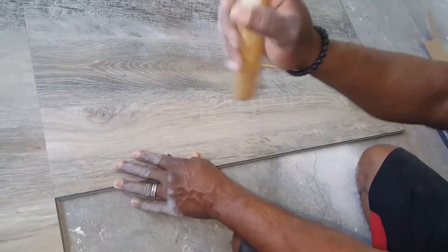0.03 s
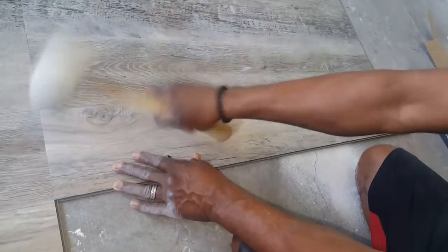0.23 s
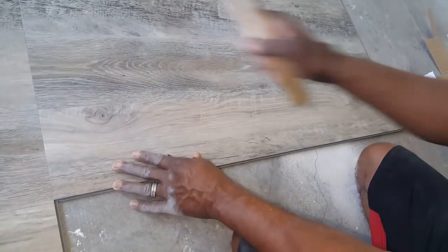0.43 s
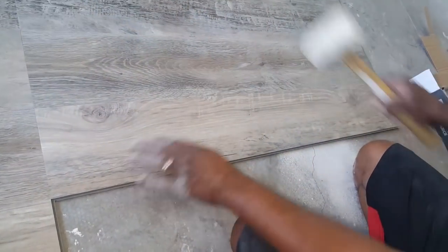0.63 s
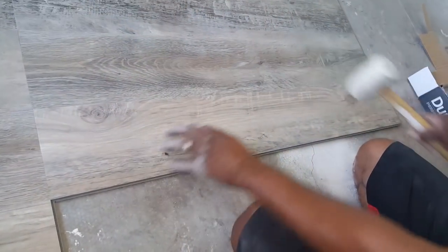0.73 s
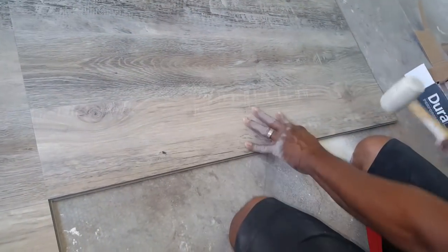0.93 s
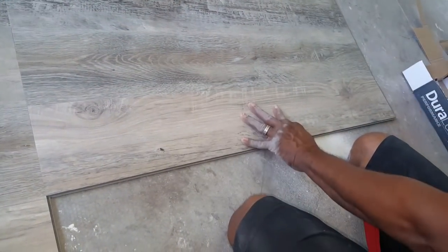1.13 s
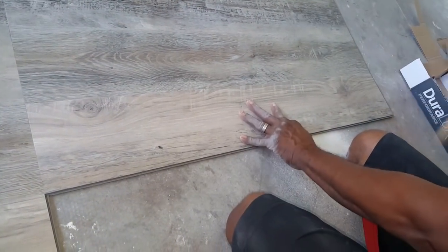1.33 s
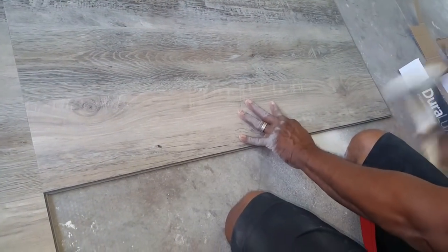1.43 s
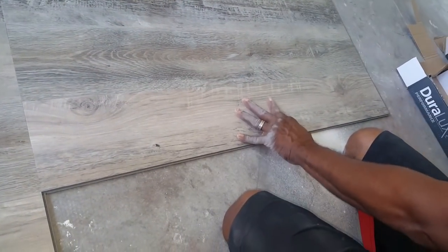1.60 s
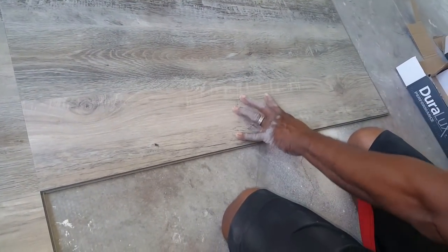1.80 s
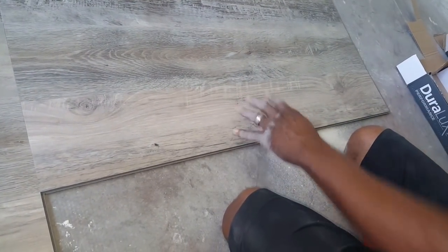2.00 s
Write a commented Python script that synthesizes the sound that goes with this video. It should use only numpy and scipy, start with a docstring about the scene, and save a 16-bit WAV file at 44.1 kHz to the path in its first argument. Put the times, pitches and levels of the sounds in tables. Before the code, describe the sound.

Rubber mallet knocks a floor plank into place, two hard echoing blows in a bare room

```python
"""A rubber mallet knocks a vinyl plank home on a concrete floor in a bare, echoing room.
The take opens in the echo of a blow just before the start; knocks follow near 0.5 and 1.7 s, each a
coloured pulse in a noise-built room plus ringing plank modes. After each, a sliding low cut thins the left.
An open left microphone overloads and a muffled right one rumbles; room tone, hum, brief noise bands and
hiss, made of shaped noise and a sine, lie beneath."""
import sys
import numpy as np
from scipy import signal
from scipy.fft import rfft, irfft
from scipy.io import wavfile

SR = 44100
rng = np.random.default_rng(int(sys.argv[2]) if len(sys.argv) > 2 else 0)


def unload_wav(signal):
    """Save mono or channel-first audio to the path in sys.argv[1] as 16-bit WAV at rate SR, clipped to [-1, 1]."""
    wavfile.write(
        sys.argv[1],
        SR,
        np.round(np.clip(np.atleast_2d(signal).T, -1, 1) * 32767).astype(np.int16),
    )


N = 90713  # samples in the take

# edge of the sliding low cut on the left: [t/s, f/Hz, depth 0-1, lift just above the edge/dB]
EDGE = [(0, 3470, 0.59, -4), (.15, 1950, 0.34, -17), (.19, 1740, 0.29, 16), (.3, 1890, 0.28, 18),
        (.38, 1650, 0.78, 10), (.39, 1650, 0.03, 28), (.555, 890, 0, 28), (.568, 2260, 0.58, 7),
        (.59, 4800, 0.55, 12.5), (.635, 6750, 0.85, 1), (.67, 6500, 0.81, 1), (.695, 5940, 0.68, -17),
        (.715, 3330, 0.78, -11), (.8, 2500, 0.79, -1), (.88, 1700, 0.69, 10), (1.015, 1570, 0.85, 12),
        (1.03, 1500, 0.19, 2.3), (1.785, 710, 0, 4.5), (1.8, 2040, 0.8, 13.5), (1.82, 4020, 0.69, 17),
        (1.855, 5830, 0.75, 7), (1.865, 2850, 0.81, -7), (1.95, 2560, 0.82, 2.5), (2.06, 1570, 0.86, 6)]


def amp(db):
    """Amplitude factor of a level in dB."""
    return 10 ** (np.asarray(db) / 20)


def evened(x):
    """Scales x to an rms of 1."""
    return x / np.sqrt(np.mean(x ** 2) + 1e-20)


def read(points, hz):
    """Reads a two-column curve, interpolated over log frequency."""
    f, value = np.transpose(points)
    return np.interp(np.log(hz + 1), np.log(f + 1), value)


def over_time(points, t, column=1):
    """Reads one column of a table whose first column is time."""
    rows = np.array(points)
    return np.interp(t, rows[:, 0], rows[:, column])


def shaped(x, gain):
    """Filters x by a function of Hz."""
    return irfft(rfft(x) * gain(np.fft.rfftfreq(len(x), 1 / SR)), len(x))


def noise(colour):
    """Steady noise with the given colour and an rms of 1."""
    return evened(shaped(rng.standard_normal(N), lambda hz: amp(read(colour, hz))))


def ring(modes, t):
    """Sum of resonances, each a sine that dies away exponentially."""
    return sum(amp(db - 60 * t / t60) * np.sin(2 * np.pi * hz * t) for hz, db, t60 in modes)


def blow(colour, s, force_db, thud_db, right_db, rise_s):
    """One knock: the pulse excites the room and the plank rings; heard at both microphones."""
    # ringing of the plank: [f/Hz, level/dB, t60/s]
    plank_modes = [(56, -21.5, 0.045), (92.6, -3.5, 0.14), (123, -2.5, 0.11), (165, 2, 0.087),
                   (292.5, -19, 0.015), (468, -28, 0.1), (867, 9, 0.019), (1600, -29, 0.12),
                   (1952, 1, 0.059)]
    # tone of the muffled right microphone: [f/Hz, level/dB]
    muffle = [(8, -38), (40, -10), (150, -10.5), (400, -9.5), (1000, -13), (2000, -17), (4500, -18),
              (8000, -44.5), (15000, -33)]
    # likeness of the room sound at the two microphones: [f/Hz, likeness 0-1]
    likeness = [(40, .6), (200, 0.81), (500, 0.67), (1000, 0.78), (2000, 0.17), (15000, .05)]
    blow_db, thud_right_db = 24.5, -2
    lead_rad = 1  # phase turn of the shared sound on the right

    thud = ring(plank_modes, np.arange(8000) / SR)
    thud = -amp(thud_db) * thud / np.linalg.norm(thud)
    pulse = click(colour)
    left_room = signal.fftconvolve(room(), pulse)
    other_room = signal.fftconvolve(room(), pulse)

    pad = 8192  # lead-in samples, for a blow before the start
    size, at = N + pad, pad + round(s * SR)
    near, other, body = np.zeros((3, size))
    for line, heard in ((near, left_room), (other, other_room), (body, thud)):
        rise = (1 - np.exp(-np.arange(len(heard)) / (rise_s * SR))) ** 2
        line[at:][:len(heard)] = (heard * rise)[:size - at]

    def shared_gain(hz):
        same = np.clip(read(likeness, hz), 0, 1)
        return same * amp(read(muffle, hz)) * np.exp(-1j * lead_rad)

    def separate_gain(hz):
        same = np.clip(read(likeness, hz), 0, 1)
        return np.sqrt(1 - same ** 2) * amp(read(muffle, hz))

    right = shaped(near + amp(thud_right_db) * body, shared_gain) + shaped(other, separate_gain)
    right[:at] = 0  # nothing ahead of the blow
    both = np.array([near + body, amp(right_db) * right])
    return amp(blow_db + force_db) * both[:, pad:]


def click(colour):
    """Causal minimum-phase pulse with the given colour and an energy of 1."""
    log_gain = np.log(amp(read(colour, abs(np.fft.fftfreq(4096, 1 / SR)))))
    pulse = np.fft.ifft(np.exp(np.conj(signal.hilbert(log_gain)))).real[:2048]
    return pulse / np.linalg.norm(pulse)


def room():
    """Response of the bare room: plank slap, near walls, standing waves and two overlapping tails."""
    # near walls: [delay t/s, level/dB]
    walls = [(.013, -10), (.021, -13), (.027, -12.5), (0.032, -8)]
    # two overlapping tails, each with its own decay by frequency: [f/Hz, t60/s]
    first_decay = [(40, .2), (150, 0.75), (500, 0.9), (1500, 1), (4000, 0.39), (9000, 0.55), (15000, 0.41)]
    second_decay = [(40, 0.1), (150, 1.07), (500, 1.025), (1500, 0.76), (4000, 1.256), (9000, 0.89),
                    (15000, 0.15)]
    # standing waves: [f/Hz, level/dB, t60/s]
    standing_waves = [(178.5, -8.5, 0.44), (240, -17, 1.345), (356.4, -10, 0.86), (427.6, -13, 0.92)]
    first_db, second_db, build_s = -1.5, -4.5, 0.006
    slap_delay_s, slap_decay_s, slap_db = 0.00086, 0.0028, 3

    t = np.arange(2 * SR) / SR
    build = 1 - np.exp(-t / build_s)
    hz, frames, z = signal.stft(rng.standard_normal(len(t)), SR, nperseg=256)
    tails = []
    for db, decay in ((first_db, first_decay), (second_db, second_decay)):
        t60 = read(decay, hz)[:, None]
        tails.append(amp(db - 60 * frames / t60) / np.sqrt(t60))
    diffuse = signal.istft(z * np.hypot(*tails), SR, nperseg=256)[1][:len(t)]
    out = diffuse * build * np.sqrt(14 / SR)

    # the plank's slap and each wall echo are short noise bursts
    for delay, db in [(slap_delay_s, slap_db)] + walls:
        burst = rng.standard_normal(1500) * np.exp(-t[:1500] / slap_decay_s)
        out[round(delay * SR):][:1500] += amp(db) * burst / np.linalg.norm(burst)
    return out + ring(standing_waves, t) * build / np.sqrt(SR)


def limited(x):
    """Gain control that falls at once and recovers steadily, then soft clipping."""
    limit_db, limit_share = -8, 0.23  # threshold; share of the excess that is taken off
    held_fall = 188  # dB/s, fall of the held level after a peak
    knee, ceiling = 14, 0.86  # sharpness of the clipping, full-scale share
    power_db = 10 * np.log10(abs(signal.lfilter([.01], [1, -.99], x ** 2)) + 1e-12)
    fall = np.arange(N) * held_fall / SR
    held_db = np.maximum.accumulate(power_db + fall) - fall
    over_db = np.maximum(held_db - limit_db, 0)
    x = x / amp(limit_share * over_db)
    return ceiling * x / (1 + abs(x) ** knee) ** (1 / knee)


def sliding_cut(x):
    """Filter that lowers all below a moving edge and lifts or dips a band just above it."""
    # gain below the edge at full depth: [f/Hz, level/dB]
    cut = [(40, -2.5), (150, -24), (600, -18.5), (1500, -20.5), (2800, -21), (3600, -14), (4500, -26),
           (7000, -15.5)]
    notch_db, notch_oct = -3, 0.15  # extra cut just under the edge
    peak_oct, steep_oct = 0.22, 0.11  # widths of the lift and of the edge itself
    hz, t, z = signal.stft(x, SR, nperseg=512, noverlap=448)
    depth = over_time(EDGE, t, column=2)
    lift_db = over_time(EDGE, t, column=3) * np.minimum(10 * depth, 1)  # fades at slight depth
    octaves = np.log2((hz[:, None] + 1) / over_time(EDGE, t))
    below = .5 - .5 * np.tanh(octaves / steep_oct)
    notch = notch_db * np.exp(-(octaves / notch_oct) ** 2)
    db = below * (read(cut, hz)[:, None] + notch) * depth
    db += (1 - below) * lift_db * np.exp(-(octaves / peak_oct) ** 2)
    return signal.istft(z * amp(db), SR, nperseg=512, noverlap=448)[1][:N]


def rumble(t):
    """Lumpy low noise, strong on the right and faint on the left, lowered as the cut deepens."""
    # swells of the rumble: [t/s, level/dB]
    swells = [(0, -51), (.39, -42.5), (.41, -42), (.43, -54), (.46, -34), (.495, -58), (.52, -45),
              (1.03, -50.5), (1.08, -55.5), (1.14, -56.5), (1.22, -58), (1.26, -57), (1.285, -37),
              (1.31, -56), (1.37, -42), (1.42, -53.5), (1.445, -52), (1.47, -49), (1.53, -47), (1.555, -48),
              (1.6, -48), (1.67, -49), (1.695, -50), (1.75, -47.5), (2.06, -50)]
    # tone of the rumble: [f/Hz, level/dB]
    rumble_colour = [(20, -9), (60, 12), (120, 10), (250, -9.5), (500, -39.5), (1000, -62), (15000, -92.5)]
    lump_db, left_db, cut_db = 2.5, -12.5, -25
    lumps = evened(shaped(rng.standard_normal(N), lambda hz: np.exp(-(hz / 22) ** 2)))
    level = amp(over_time(swells, t) + lump_db * lumps + cut_db * over_time(EDGE, t, column=2))
    return np.array([amp(left_db) * level * noise(rumble_colour), level * noise(rumble_colour)])


def brief_bands(t):
    """Noise bands that swell and fade as bell curves, from a treble wash to a faint tick."""
    # lingering treble wash, low stir, small click, thin high hiss, faint tick:
    # [centre t/s, length/s, f/Hz, width/octaves, level/dB]
    band_rows = [(0.26, 0.31, 5100, 0.84, -41.5), (0.42, 0.17, 607, 2, -41),
                 (0.483, 0.0086, 4970, 0.44, -46), (1.155, 0.24, 13900, 0.6, -62),
                 (1.627, 0.062, 3800, 0.2, -64)]
    out = np.zeros(N)
    for s, length, centre_hz, octaves, db in band_rows:
        def band_gain(hz):
            return np.exp(-(np.log2((hz + 1) / centre_hz) / octaves) ** 2)
        band = evened(shaped(rng.standard_normal(N), band_gain))
        out += amp(db) * band * np.exp(-(2 * (t - s) / length) ** 2)
    return out


def room_tone(t):
    """Steady coloured noise of the room, with a faint sine hum."""
    # tone of the still room: [f/Hz, level/dB]
    air = [(30, -11), (90, -7), (240, 0), (500, -6.5), (1000, -9.5), (1700, -10), (2200, -14),
           (2700, -23.5), (5000, -29), (10000, -32), (15500, -54)]
    air_db, hum_hz, hum_db = -51, 240, -60
    return amp(air_db) * noise(air) + amp(hum_db) * np.sin(2 * np.pi * hum_hz * t)


def hiss(t):
    """Coloured noise at the right microphone, its level drifting."""
    # drift of the hiss: [t/s, level/dB]
    hiss_level = [(0, -75), (.49, -68), (.52, -71), (1.05, -91), (1.45, -69.5), (1.69, -69), (1.72, -91),
                  (2.06, -91)]
    # tone of the hiss: [f/Hz, level/dB]
    hiss_colour = [(200, 5), (1000, 1.5), (4000, -11), (15000, -16.5)]
    return amp(over_time(hiss_level, t)) * noise(hiss_colour)


def scene():
    """The blows in the room, over the background at both microphones."""
    # blows: [t/s, force level/dB, thud level/dB, right microphone level/dB, rise/s]
    blows = [(-.12, 4, 1, -2, 0.00027), (0.5021, -0.5, -2.5, -13.5, 0.000067),
             (1.698, 4, -7.5, -22.5, 0.0016)]
    # colour of each blow, one curve a blow: [f/Hz, level/dB]
    colours = [
        [(20, -8), (120, -20), (200, 3.5), (400, 2.5), (700, -2.5), (1100, -11.5), (1900, -11.5), (2800, -17.5),
         (4500, -22), (9000, -17.5), (13000, -23.5), (15500, -71)],
        [(20, -26.5), (60, -42), (177, -1), (467, -4.5), (639, -7.5), (830, -6), (1170, -15), (1770, -7.5),
         (4090, -25.5), (9940, -24), (13300, -29), (15500, -51)],
        [(20, -59), (60, -10.5), (173, -8.5), (410, -2.5), (500, -8), (700, -2.5), (1050, -0.5), (1450, -6),
         (1800, 3), (2300, -5.5), (3200, -4.5), (4660, -14), (9680, -19.5), (14000, -29), (15500, -78)],
    ]
    t = np.arange(N) / SR
    knocks = sum(blow(colour, *row) for colour, row in zip(colours, blows))
    return knocks + rumble(t) + np.array([room_tone(t) + brief_bands(t), hiss(t)])


def record(dry):
    """Limiter and sliding low cut on the left microphone, band limit on both."""
    out = np.array([sliding_cut(limited(dry[0])), dry[1]])
    top_hz = 15600
    low_pass = signal.firwin(511, top_hz, window=("kaiser", 9), fs=SR)
    return signal.oaconvolve(out, low_pass[None], "same")


dry = scene()
out = record(dry)
unload_wav(out)
```